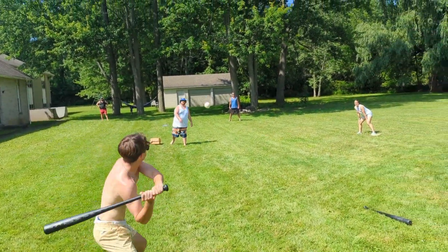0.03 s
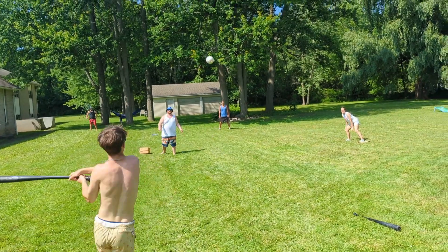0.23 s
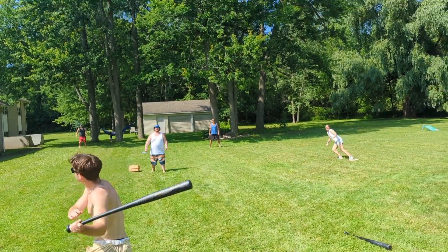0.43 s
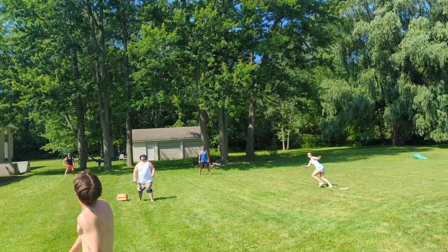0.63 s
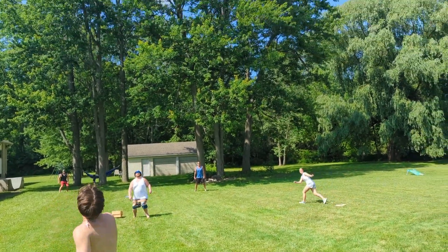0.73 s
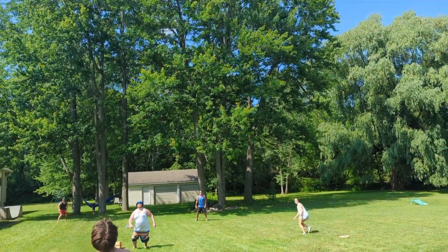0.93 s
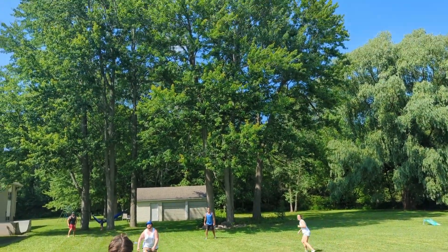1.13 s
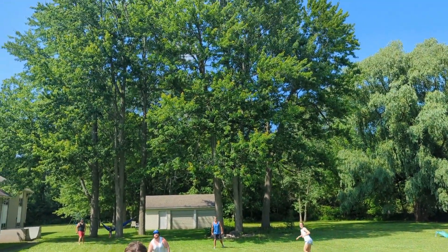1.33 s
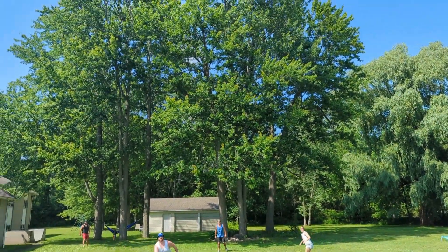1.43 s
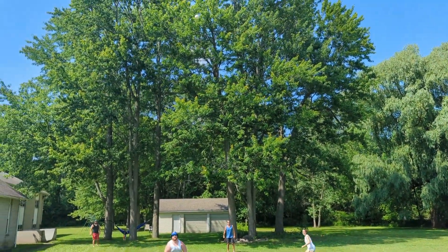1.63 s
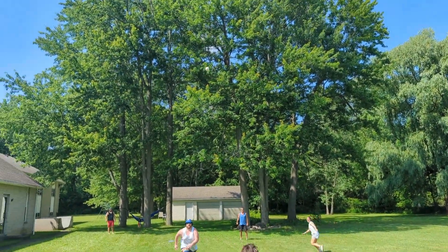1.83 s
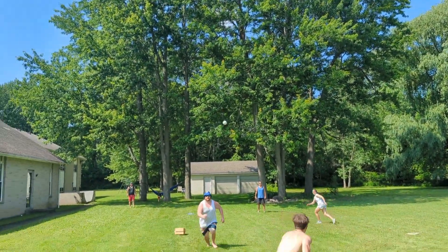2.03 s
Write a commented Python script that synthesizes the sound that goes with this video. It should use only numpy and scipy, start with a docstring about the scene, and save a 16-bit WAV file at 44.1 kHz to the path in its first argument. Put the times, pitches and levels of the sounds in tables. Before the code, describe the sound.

A sharp, hollow plastic bat-and-ball crack bursts close to the microphone at 0.2 seconds, after quiet outdoor air, faint motor hum and a tiny chirp. Its short ring pops and buzzes; wall slaps follow around 0.35-0.45, with a long tree wash. Faint chirps sound near 0.8. Hollow bat knocks come at 1.15, 1.8 (strongest) and 2.1, among dry clicks, grass swishes and soft footfalls at 1.5 and 1.85.

```python
"""Quiet outdoor air, a far motor's hum, a faint chirp and a light grass swish lead into a sharp crack:
a hollow plastic bat hits a light plastic ball on a lawn, close to the microphone.
Buildings slap the crack back and trees return a long wash, in which more chirps sound. The tumbling
bat then knocks hollowly, among dry clicks, swishing feet and soft footfalls. Decaying sines make the
rings; shaped noise makes crack, echoes, thuds, clicks, grass and air; gliding sines make bird and motor."""
import sys
import numpy as np
from scipy import signal
from scipy.fft import rfft, irfft
from scipy.io import wavfile
from scipy.ndimage import map_coordinates

SR = 44100
rng = np.random.default_rng(int(sys.argv[2]) if len(sys.argv) > 2 else 0)


def to_wav(s):
    """Save 16-bit WAV."""
    ch = np.atleast_2d(s).T  # columns
    pcm = np.round(np.clip(ch, -1, 1) * 32767)  # PCM
    wavfile.write(sys.argv[1], SR, pcm.astype(np.int16))


N = 92610  # samples, 2.1 s

# A "T60" is the time [s] in which a sound fades by 60 dB.
# Noise spectra set only the balance of pitches; each noise is then scaled to rms 1.

# The hit: the ball's shell is dented at HIT_S and pops back at POP_S
HIT_S, POP_S = 0.2107, 0.2425
# Ring of the dented shell: (frequency [Hz], level [dB], T60 [s])
DENTED_RING = [(280, -27, .15), (375, -15, .9), (728, -22.5, .3), (1400, -28, .08), (1530, -27, .09),
               (2850, -24.5, .06)]
# Ring of the shell after it pops back: (frequency [Hz], level [dB], T60 [s])
FREE_RING = [(388, -29, .24), (815, -25, .11), (1225, -26.5, .12), (1620, -32, .11), (2205, -34, .12),
             (2700, -42, .11)]
DENT_T60, SHELL_RISE_S = 0.014, 0.0005
SHELL_ROUGH_RAD = 0.15  # random phase shake of the ring
LEFT_LEAD_S, HIT_PAN_DB = 0.000091, 4  # the batter stands to the left
# Spectrum of the crack: (frequency [Hz], relative level [dB])
CRACK_SPECTRUM = [(400, -20), (1300, -6), (2700, -9), (4200, -21), (8000, -10), (11000, 1), (15000, 0),
                  (17000, -8)]
CRACK_DB, CRACK_T60, CRACK_RISE_S = 3, 0.0012, 0.00004
SPLINTER_DB, SPLINTER_T60 = -16.5, 0.018  # the crack's brief ragged tail
# Spectrum of the buzz: (frequency [Hz], relative level [dB])
BUZZ_SPECTRUM = [(30, -22.5), (120, -6.5), (300, 6.5), (1000, -9), (1500, -6), (2700, -12), (3600, -13.5),
                 (8000, -13.5), (15500, -10.5), (16500, -33)]
BUZZ_DB, BUZZ_T60 = -25, 0.11
# Spectrum of the air rushing round the bat: (frequency [Hz], relative level [dB])
SWING_SPECTRUM = [(30, -20), (90, 2.5), (700, -23), (3000, -36)]
SWING_DB, SWING_TIME_S = -34, 0.02

# Spectrum of the crack scattered by the yard: (frequency [Hz], relative level [dB])
YARD_SPECTRUM = [(40, -13), (120, -4), (220, -6), (420, 2), (900, -5.5), (1600, -1.5), (2700, -9.5),
                 (4000, -14), (8000, -15), (12000, -11), (15500, -14.5), (16500, -36.5)]
YARD_DB, YARD_T60 = -32.5, 0.82
# Spectrum of the wash from the trees: (frequency [Hz], relative level [dB])
TREE_SPECTRUM = [(80, -16), (250, -4), (480, -5.5), (850, -3.5), (1600, 6), (2600, -6), (4000, -13),
                 (6500, -22), (9000, -25)]
TREES_DB, TREES_RISE_S, TREES_FADE_START_S, TREES_T60 = -56.5, 0.19, 0.81, 1.61
# Echoes of the crack off walls: (time [s], level [dB], T60 [s])
WALL_ECHOES = [(0.363, -36.5, 0.11), (0.386, -36.5, 0.11), (0.46, -29.5, 0.045), (0.869, -52, 0.078)]
# Spectrum of those echoes: (frequency [Hz], relative level [dB])
SLAP_SPECTRUM = [(60, -13), (200, 0), (480, -15), (800, -14), (1300, 1), (2050, -1), (2450, -18),
                 (2870, -3), (3300, -18), (16000, -40)]
ECHO_RISE_S = 0.0015
# A wall returns the shell's low ring; the slope is in dB per octave
BOOM_S, BOOM_DB, BOOM_HZ, BOOM_SLOPE_DB, BOOM_WIDTH_S = 0.402, -45.5, 460, 40, 0.02

# Ring of the air inside the bat, before each knock's tone: (frequency [Hz], level [dB], T60 [s])
BAT_AIR_RING = [(461, 0, .074), (605, -6, .035), (1428, -7, .06), (2570, -11, .032), (3680, -26, .025)]
# The bat's knocks: (time [s], level [dB], overtone and thud change [dB], brightness [dB per octave])
BAT_KNOCKS = [(1.1435, -34, -17, -3), (1.8005, -25, 0, -1.5), (2.0905, -37, 0, 6.5)]
# Spectrum of a knock's thud: (frequency [Hz], relative level [dB])
THUD_SPECTRUM = [(380, -30), (600, 2), (880, -5), (1200, 5), (1700, -18), (8000, -36)]
KNOCK_RISE_S, KNOCK_LOW_CUT_HZ, KNOCK_PAN_DB = 0.0012, 370, -4.5
THUD_DB, THUD_T60 = -11, 0.022  # level before each knock's own changes

# Dry clicks: (time [s], level [dB], centre [Hz], fall to each side [dB per octave])
CLICKS = [(.2362, -24, 11500, 15), (.2365, -21, 2430, 50), (.2402, -18, 450, 9), (1.1413, -43, 2450, 50),
          (1.1413, -47, 3480, 130), (1.1413, -53, 5000, 9), (1.143, -37, 360, 45), (1.5995, -41, 1900, 18),
          (1.6075, -44, 1000, 20), (2.087, -34, 1620, 70), (2.0885, -38, 3150, 60)]
CLICK_T60, CLICK_RISE_S, CLICK_PAN_DB = 0.016, 0.0004, -2.6

# Feet swishing through grass: (peak time [s], level [dB], rise [s], fall [s])
GRASS_SWISHES = [(.135, -62, 0.016, 0.0054), (0.579, -55, 0.047, 0.036), (0.728, -55.5, 0.0027, 0.031),
                 (1.45, -61, 0.054, 0.081), (1.749, -60.5, 0.038, 0.054), (1.855, -53, 0.044, 0.028),
                 (1.933, -52.5, 0.016, 0.018), (2.049, -57.5, 0.027, 0.16)]
# Spectrum of the grass: (frequency [Hz], relative level [dB])
GRASS_SPECTRUM = [(300, 2.5), (1000, 3), (8000, -9.5), (15500, -9), (16500, -27)]
GRASS_ROUGH_DB = 1.8
# Footfalls: (time [s], level [dB])
FOOTFALLS = [(1.504, -51), (1.8531, -40)]
# Spectrum of a footfall: (frequency [Hz], relative level [dB])
FOOTFALL_SPECTRUM = [(30, -23), (90, 2), (180, 14.5), (320, -4), (700, -37), (3000, -33.5)]
FOOTFALL_RISE_S, FOOTFALL_T60 = 0.0029, 0.048

# Bird chirps: (time [s], length [s], start pitch [Hz], end pitch [Hz], level [dB])
BIRD_CHIRPS = [(0.108, 0.029, 2870, 2600, -60), (.779, 0.043, 3350, 2450, -55),
               (0.82, 0.2, 2480, 2330, -63), (.68, .42, 6450, 6200, -77)]

# How loud the outdoor air is: (time [s], level [dB])
AIR_LEVEL = [(0, -62.5), (.5, -53.5), (1, -64.5), (1.27, -68), (1.42, -58.5), (1.67, -63), (2.1, -62.5)]
# Spectrum of the outdoor air: (frequency [Hz], relative level [dB])
AIR_SPECTRUM = [(25, -18.5), (130, 0.5), (220, -5.5), (450, 4.5), (800, -9.5), (1500, -3), (2600, -4),
                (4000, -14.5), (6400, -13), (8000, -23), (15500, -16), (16500, -41.5)]
# The far motor's hum: (time [s], pitch [Hz], level [dB])
MOTOR_HUM = [(0, 78.86, -56.5), (1.2, 87.97, -71.5), (2.1, 98.3, -73)]

# Likeness of left and right for near sounds: (frequency [Hz], likeness [0-1])
NEAR = [(200, 0.97), (700, 0.95), (4000, 0.2), (14000, 0.1)]
# Likeness of left and right for far sounds: (frequency [Hz], likeness [0-1])
FAR = [(150, 0.9), (450, 0.49), (1200, 0.18), (12000, 0.088)]
LOW_CUT_HZ, TOP_HZ = 44, 16300  # the recorder's range


def amp(db):
    """Turn decibels into gain."""
    return 10 ** (np.asarray(db) / 20)


def unit(x):
    """Scale a sound to rms 1."""
    return x / np.sqrt(np.mean(x ** 2) + 1e-20)


def along(points, hz):
    """Read a (frequency, value) curve on a logarithmic frequency axis."""
    f, value = np.transpose(points)
    return np.interp(np.log(hz + 1), np.log(f + 1), value)


def since(s):
    """Seconds passed since time s, zero before it."""
    return np.maximum(np.arange(N) / SR - s, 0)


def curves(rows):
    """Draw straight lines through each column after the time, one value per sample."""
    s, *columns = np.transpose(rows)
    return [np.interp(since(0), s, column) for column in columns]


def wobble(rate):
    """Make a smooth random curve with rate knots a second."""
    knots = rng.standard_normal(int(N * rate / SR) + 4)
    return map_coordinates(knots, [since(0) * rate])


def sine(hz):
    """Make a sine wave whose pitch may change from sample to sample."""
    return np.sin(2 * np.pi * np.cumsum(hz) / SR)


def noise(spectrum, alike):
    """Make coloured stereo noise of rms 1; two random parts mix to set the left-right likeness."""
    hz = np.fft.rfftfreq(N, 1 / SR)
    turn = np.arccos(np.clip(along(alike, hz), -1, 1)) / 2
    coloured = rfft(rng.standard_normal((2, N))) * amp(along(spectrum, hz))
    mid, side = irfft(coloured * [np.cos(turn), np.sin(turn)], N)
    return unit(np.array([mid + side, mid - side]))


def band(hz, slope_db):
    """Make stereo noise of rms 1 that weakens by slope_db per octave on both sides of hz."""
    octaves = np.arange(-10, 10)
    return noise(np.transpose([hz * 2. ** octaves, -slope_db * np.abs(octaves)]), NEAR)


def burst(s, rise, t60, hold=0):
    """Loudness shape that rises at time s, holds, then fades exponentially."""
    return (1 - np.exp(-since(s) / rise)) * amp(-60 * since(s + hold) / t60)


def pan(db):
    """Left and right gains for a level difference; positive favours the left."""
    return amp(np.array([[db], [-db]]) / 2)


def high_pass(x, order, hz):
    """Weaken everything below hz."""
    return signal.sosfilt(signal.butter(order, hz, "high", fs=SR, output="sos"), x)


def shell_ring(modes, start):
    """The shell shakes at several pitches, each fading at its own speed and reaching the left first."""
    lead = LEFT_LEAD_S * np.array([[1], [-1]]) / 2
    ring = 0
    for hz, db, t60 in modes:
        phase = 2 * np.pi * hz * (since(start) + lead) + SHELL_ROUGH_RAD * wobble(200)
        ring = ring + amp(db) * np.sin(phase) * burst(start, SHELL_RISE_S, t60)
    return ring


def hit():
    """Air rushes, the ball cracks; its dented shell buzzes, then pops back to a slightly higher main ring."""
    dented = shell_ring(DENTED_RING, HIT_S) * amp(-60 * since(POP_S) / DENT_T60)
    shell = dented + shell_ring(FREE_RING, POP_S)
    snap = amp(CRACK_DB) * burst(HIT_S, CRACK_RISE_S, CRACK_T60)
    splinter = amp(SPLINTER_DB) * burst(HIT_S, CRACK_RISE_S, SPLINTER_T60)
    crack = (snap + splinter) * noise(CRACK_SPECTRUM, NEAR)
    # the buzz stays level for about 30 ms, then fades
    buzz_shape = burst(HIT_S, SHELL_RISE_S, BUZZ_T60, POP_S - HIT_S)
    buzz = amp(BUZZ_DB + 0.48 * wobble(500)) * noise(BUZZ_SPECTRUM, NEAR) * buzz_shape
    # the rush grows up to the contact, then dies away
    swing_shape = np.exp(-np.abs(since(0) - HIT_S) / SWING_TIME_S)
    swing = amp(SWING_DB) * noise(SWING_SPECTRUM, NEAR) * swing_shape
    return swing - shell * pan(HIT_PAN_DB) + buzz + crack


def echoes():
    """The yard scatters the crack as fading noise, walls slap it back and trees answer with a slow swell."""
    yard_level = amp(YARD_DB + 1.1 * wobble(80)) * burst(HIT_S, 0.036, YARD_T60)
    yard = yard_level * noise(YARD_SPECTRUM, FAR)
    swell = np.minimum(since(HIT_S) / TREES_RISE_S, 1) * amp(-60 * since(TREES_FADE_START_S) / TREES_T60)
    trees = amp(TREES_DB + 2.1 * wobble(35)) * noise(TREE_SPECTRUM, FAR) * swell
    slaps = sum(amp(db) * noise(SLAP_SPECTRUM, FAR) * burst(s, ECHO_RISE_S, t60)
                for s, db, t60 in WALL_ECHOES)
    boom_shape = np.exp(-((since(0) - BOOM_S) / BOOM_WIDTH_S) ** 2)
    boom = amp(BOOM_DB) * band(BOOM_HZ, BOOM_SLOPE_DB) * boom_shape
    return yard * pan(0.53) + trees + slaps + boom


def bat_knocks():
    """Each contact thuds and rings the air in the bat, with its own strength and brightness."""
    out = 0
    lowest_hz = BAT_AIR_RING[0][0]
    for s, db, overtone_db, bright_db in BAT_KNOCKS:
        ring = 0
        for k, (hz, level, t60) in enumerate(BAT_AIR_RING):
            mode_db = level + bright_db * np.log2(hz / lowest_hz) + overtone_db * (k > 0)
            tone = np.sin(2 * np.pi * hz * since(s)) * burst(s, KNOCK_RISE_S, t60)
            ring = ring + (-1) ** k * amp(mode_db) * tone  # neighbouring modes start in opposite directions
        thud_shape = burst(s, KNOCK_RISE_S, THUD_T60)
        thud = amp(THUD_DB + overtone_db) * noise(THUD_SPECTRUM, NEAR) * thud_shape
        out = out + amp(db) * (thud - ring)
    return high_pass(out, 4, KNOCK_LOW_CUT_HZ) * pan(KNOCK_PAN_DB)


def clicks():
    """Short dry bursts of noise, each strongest around its own frequency."""
    return pan(CLICK_PAN_DB) * sum(amp(db) * band(hz, slope_db) * burst(s, CLICK_RISE_S, CLICK_T60)
                                   for s, db, hz, slope_db in CLICKS)


def running():
    """Feet brush the grass in swells of rough noise and land with soft, low bursts."""
    t = since(0)
    power = 0
    for s, db, rise, fall in GRASS_SWISHES:
        width = np.where(t < s, rise, fall)
        power = power + amp(db) ** 2 * np.exp(-((t - s) / width) ** 2)
    roughness = amp(GRASS_ROUGH_DB * wobble(210))
    grass = np.sqrt(power) * roughness * noise(GRASS_SPECTRUM, FAR)
    step_shape = sum(amp(db) * burst(s, FOOTFALL_RISE_S, FOOTFALL_T60) for s, db in FOOTFALLS)
    return grass + noise(FOOTFALL_SPECTRUM, NEAR) * step_shape


def bird():
    """Faint whistles whose wavering pitch falls while the loudness swells and fades."""
    out = 0
    for s, length, start_hz, end_hz, db in BIRD_CHIRPS:
        progress = np.minimum(since(s) / length, 1)
        hz = start_hz + (end_hz - start_hz) * progress + 70 * wobble(300)
        out = out + amp(db + 3.1 * wobble(60.4)) * np.sin(np.pi * progress) * sine(hz)
    return out


def background():
    """Outdoor air is noise of changing level; a far motor hums as a wavering low tone."""
    air_db, = curves(AIR_LEVEL)
    hum_hz, hum_db = curves(MOTOR_HUM)
    hum = amp(hum_db + 2 * wobble(15)) * sine(hum_hz + 4 * wobble(30))
    return amp(air_db) * noise(AIR_SPECTRUM, FAR) + hum


def scene():
    """Add up everything on the lawn."""
    return hit() + echoes() + bat_knocks() + clicks() + running() + bird() + background()


def record(dry):
    """The recorder sheds the deepest bass, rounds off high peaks and strongly cuts above its top frequency."""
    thin = high_pass(dry, 2, LOW_CUT_HZ)
    rounded = thin / (1 + np.abs(thin / 0.8) ** 6) ** (1 / 6)  # peaks bend towards 0.8
    return signal.sosfilt(signal.ellip(10, 0.1, 80, TOP_HZ, fs=SR, output="sos"), rounded)


dry = scene()
out = record(dry)
to_wav(out)
```